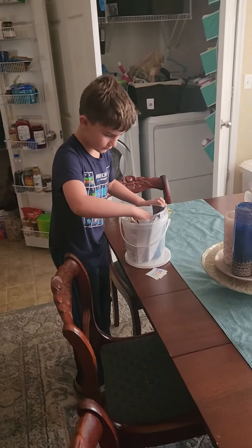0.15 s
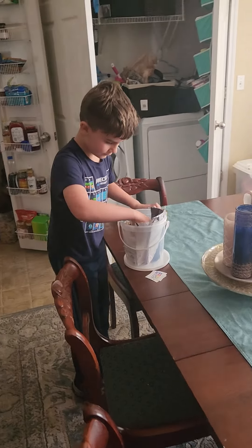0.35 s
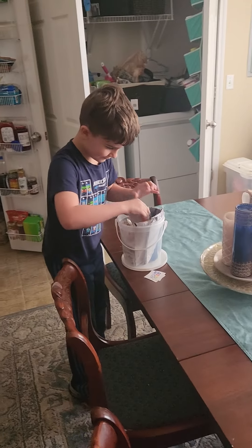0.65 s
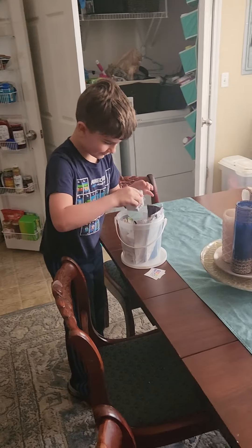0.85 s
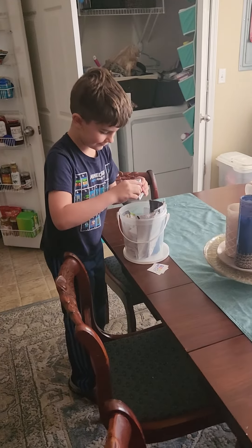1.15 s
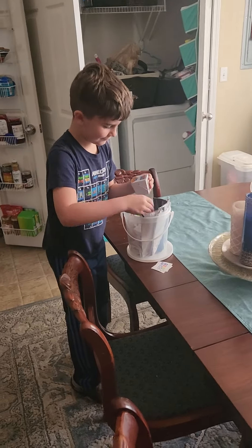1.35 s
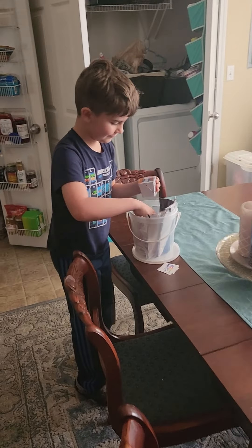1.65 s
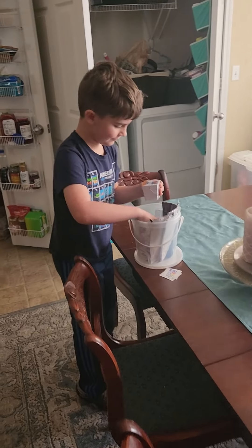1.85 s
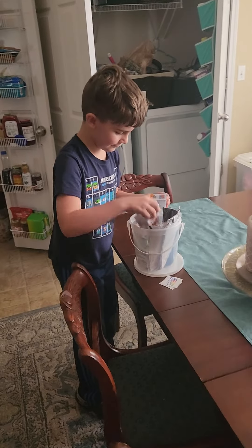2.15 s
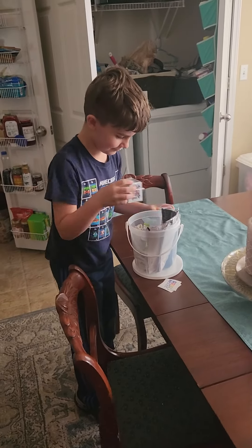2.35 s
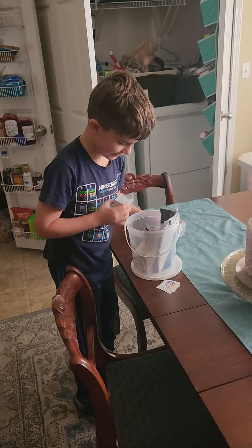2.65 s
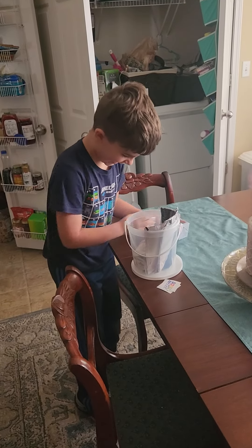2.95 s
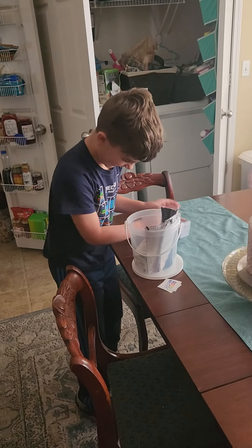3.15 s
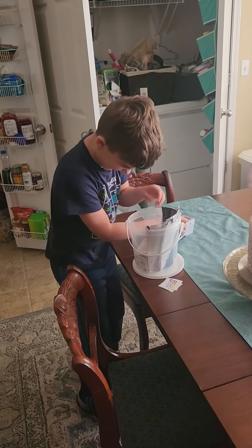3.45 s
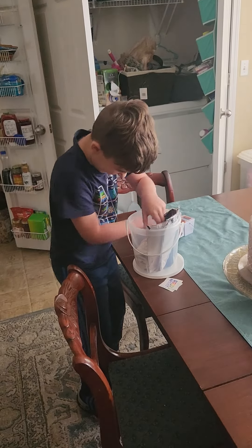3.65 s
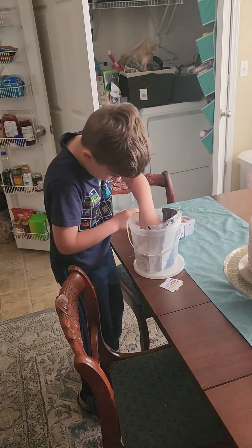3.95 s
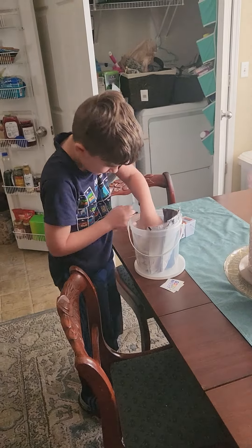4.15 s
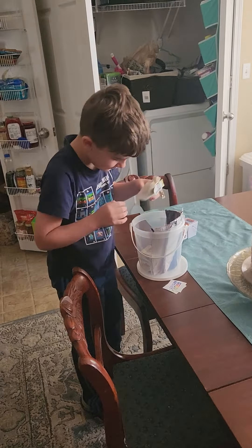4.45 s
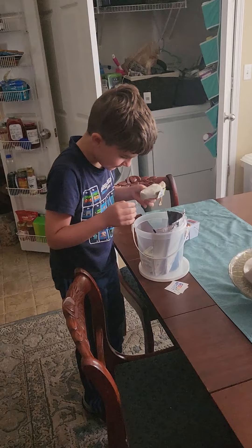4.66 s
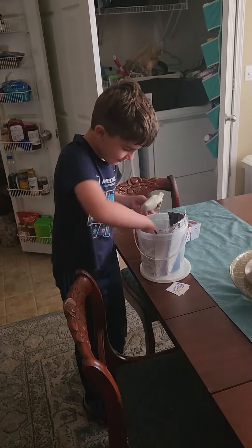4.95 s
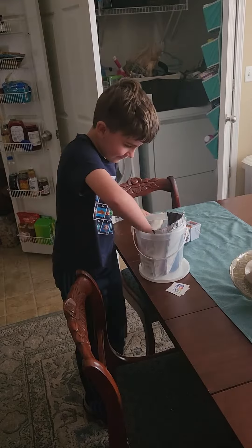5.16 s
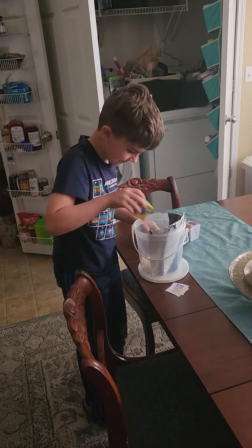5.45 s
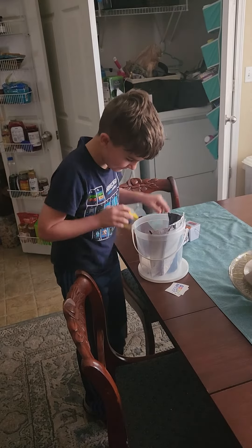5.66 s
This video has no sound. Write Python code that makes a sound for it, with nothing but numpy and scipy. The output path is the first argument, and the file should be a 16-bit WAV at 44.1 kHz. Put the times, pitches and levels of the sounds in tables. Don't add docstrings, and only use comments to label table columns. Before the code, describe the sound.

Small boxes bump the thin wall of a plastic pail while film, paper and card crackle and pop. Two busier bursts, at the start and just after three seconds, are separated by thin crisp wrapper snaps; a smaller burst comes after five seconds. Heard from a couple of metres off in a home room with a short natural echo, over very quiet household hum.

```python
import sys
import numpy as np
from scipy import signal
from scipy.io import wavfile
from scipy.ndimage import uniform_filter1d

SR = 44100
rng = np.random.default_rng(int(sys.argv[2]) if len(sys.argv) > 2 else 0)


def dump_mix(stems):
    frames = np.atleast_2d(stems).T
    limited = np.clip(frames, -1, 1)
    pcm = np.round(limited * 32767).astype(np.int16)
    wavfile.write(sys.argv[1], SR, pcm)


def magnitude_from_level(level_db):
    exponent = np.asarray(level_db, float) / 20
    return 10 ** exponent


N = 255331

# [share of its pitch, level/dB, t60/s]
BUCKET_AIR = [(0.998, -6, 0.092), (0.797, -8.5, 0.038), (1.5, -9.5, 0.048)]


def evened(x):
    return x / np.sqrt(np.mean(x ** 2) + 1e-20)


def peaked(x):
    return x / abs(x).max()


def read(points, hz):
    f, value = np.transpose(points)
    return np.interp(np.log(hz + 1), np.log(f + 1), value)


def add(mix, s, sound):
    part = mix[..., round(s * SR):][..., :sound.shape[-1]]
    part += sound[..., :part.shape[-1]]


def coloured(x, points):
    hz = abs(np.fft.fftfreq(4096, 1 / SR))
    log_gain = np.log(magnitude_from_level(np.maximum(read(points, hz), -100)))
    taps = np.fft.ifft(np.exp(np.conj(signal.hilbert(log_gain)))).real[:2048]
    taps = taps.reshape((1,) * (x.ndim - 1) + (-1,))
    return signal.oaconvolve(x, taps, axes=-1)[..., :x.shape[-1]]


def band(x, lo_hz, hi_hz):
    return signal.sosfilt(signal.butter(2, [lo_hz, hi_hz], "bandpass", fs=SR, output="sos"), x)


def resonate(x, hz, width_hz):
    turn = np.exp(2j * np.pi * np.cumsum(hz) / SR)
    pole = np.exp(-np.pi * width_hz / SR)
    return 2 * (turn * signal.lfilter([1 - pole], [1, -pole], x / turn)).real


def ring(modes, t, detune=1, rise_s=.002):
    x = 0
    for (hz, db, t60_s), d in zip(modes, detune * np.ones(len(modes))):
        x = x + magnitude_from_level(db - 60 * t / t60_s) * np.sin(2 * np.pi * hz * d * t)
    return peaked(x * (1 - np.exp(-t / rise_s)))


def pair(shape, same):
    a, b, c, d = rng.standard_normal(shape + (4,)).T
    same = np.clip(same, -1, 1)[:, None]
    left, other = a + 1j * b, c + 1j * d
    return np.array([left, same * left + np.sqrt(1 - same ** 2) * other])


def household():
    # [f/Hz, level/dB per Hz]
    hum_colour = [(12, -38), (20, 6.5), (117, 0.5), (297, -14.5), (913, -18), (1180, -17.5), (2010, -20.5),
                  (2730, -24), (5830, -28.5), (7730, -18), (8410, -33), (9670, -58), (12500, -104),
                  (15200, -77), (16500, -74)]
    # [f/Hz, likeness]
    hum_same = [(30, 0.92), (200, 0.78), (600, 0.24), (3000, 0.067), (16000, 0.034)]
    # [t/s, level/dB]
    rumble_level = [(0.0, -54.5), (1.4, -83), (1.92, -59.5), (2.32, -82), (4.55, -58.5), (5.79, -60)]
    frames, hz = N // 512 + 5, np.fft.rfftfreq(2048, 1 / SR)
    patches = uniform_filter1d(rng.standard_normal((frames, 1025)), 5, 0)
    patches = evened(uniform_filter1d(patches, 20, 1)).T
    z = pair((frames, 1025), read(hum_same, hz)) * magnitude_from_level(read(hum_colour, hz)[:, None] + 0.89 * patches)
    hum = magnitude_from_level(-68) * evened(signal.istft(z, nperseg=2048, noverlap=1536)[1][:, :N])
    rumble = evened(band(band(rng.standard_normal(N), 23.2, 36.6), 23.2, 36.6))
    return hum + rumble * magnitude_from_level(np.interp(np.arange(N) / SR, *np.transpose(rumble_level)) - 9.5)


def room(x):
    # [f/Hz, t60/s]
    room_t60 = [(100, 0.21), (400, 0.3), (1000, 0.3), (2500, 0.23), (6000, 0.22), (12000, 0.11)]
    # [f/Hz, likeness]
    room_same = [(200, 0.93), (400, 0.91), (1000, 0), (4000, 0.1)]
    # [f/Hz, level/dB]
    room_level = [(150, -4), (1000, -4.5), (5000, -5.5), (14000, -8.5)]
    hz, t = np.fft.rfftfreq(256, 1 / SR), np.arange(340) * 64 / SR
    decay = magnitude_from_level(-60 * t / read(room_t60, hz)[:, None])
    decay = decay / np.linalg.norm(decay, axis=1, keepdims=True) * magnitude_from_level(read(room_level, hz))[:, None]
    out, turn = np.zeros((2, N)), 2 * np.pi * 2.3 * np.arange(N) / SR
    for k in range(3):
        z = pair((len(t), len(hz)), read(room_same, hz)) * decay
        tail = signal.istft(z, nperseg=256, noverlap=192)[1]
        tail = np.pad(tail / np.linalg.norm(tail[0]), ((0, 0), (round(.005 * SR), 0)))
        share = np.sqrt(2 / 3) * np.cos(turn + 2 * np.pi * k / 3)
        out += signal.fftconvolve(x[None] * share, tail, axes=1)[:, :N]
    return out


def early(x):
    level_db, t60_s = -3, 0.017
    t, turn, out = np.arange(900) / SR, 2 * np.pi * 1.7 * np.arange(N) / SR, 0
    for share in (np.cos(turn), np.sin(turn)):
        taps = rng.standard_normal((2, len(t))) * (rng.random((2, len(t))) < .1) * magnitude_from_level(-60 * t / t60_s)
        taps = band(taps, 500, .49 * SR)
        taps = taps / np.linalg.norm(taps, axis=1, keepdims=True)
        out = out + signal.oaconvolve(x[None] * share, taps, axes=1)[:, :N]
    return magnitude_from_level(level_db) * out


def floor_thumps():
    # [t/s, peak level/dB]
    shifts = [
        (.775, -57),
        (3.22, -60),
        (3.3, -64),
        (3.47, -58),
        (3.53, -63),
    ]
    out, t = np.zeros(N), np.arange(9000) / SR
    for s, db in shifts:
        add(out, s, magnitude_from_level(db) * ring([(80.5, 0, .25)], t, rise_s=0.03))
    return out


def table_thuds():
    # [t/s, peak level/dB]
    blows = [(0.047, -68), (0.153, -48), (0.18, -44), (0.213, -42), (.398, -28.5), (.414, -54),
             (0.471, -42), (0.549, -53), (0.72, -41), (0.771, -32.5), (2.86, -51.5), (3.047, -47),
             (3.17, -46), (3.218, -47), (3.428, -34.5), (3.464, -33), (3.535, -44), (3.651, -39.5),
             (5.031, -71), (5.073, -67), (5.306, -60.5)]
    # [f/Hz, level/dB, t60/s]
    table_modes = [(152.3, -1.5, 0.17), (169.6, -6, 0.067), (134, -17, 0.24)]
    out, t = np.zeros(N), np.arange(9000) / SR
    for s, db in blows:
        add(out, s, magnitude_from_level(db - 8.0) * ring(table_modes, t, rise_s=0.0035))
    return out


def bucket_booms():
    # [t/s, peak level/dB, f/Hz]
    jolts = [(.152, -42.5, 382), (.179, -41.5, 377), (.399, -31.5, 343), (.414, -37.5, 312),
             (0.286, -57, 358), (.397, -38, 194), (5.3, -56, 231), (.47, -46.5, 312), (.605, -48, 380),
             (.645, -53, 387), (.685, -56, 385), (.53, -48, 403), (.571, -47, 389), (.717, -26.5, 366.6),
             (0.745, -35, 391), (0.769, -36, 344), (.789, -36.5, 363.4), (1.418, -64, 386),
             (1.577, -59, 382), (1.88, -63, 383), (1.95, -63.5, 376), (2.0, -63.5, 332), (2.074, -58, 395),
             (4.43, -62.5, 366), (5.25, -62.5, 384), (2.635, -51, 377), (2.857, -52, 332),
             (3.429, -59, 226), (3.464, -42.5, 372), (3.489, -65, 395), (3.578, -45.5, 377),
             (3.772, -53.5, 388), (3.923, -48, 377), (5.005, -54, 348), (5.03, -45.5, 448),
             (5.034, -43, 254.5), (5.068, -48.5, 343), (5.306, -49, 417)]
    out, t = np.zeros(N), np.arange(9000) / SR
    for s, db, hz in jolts:
        add(out, s, magnitude_from_level(db - 0.5) * ring(BUCKET_AIR, t, hz, rise_s=0.0018))
    return out


def tink():
    # t/s, peak level/dB, f/Hz, t60/s
    touch = (2.401, -61, 2240, .05)
    s, db, hz, t60_s = touch
    out, t = np.zeros(N), np.arange(9000) / SR
    add(out, s, magnitude_from_level(db) * ring([(hz, 0, t60_s)], t, rise_s=0.00032))
    return out


def knocks():
    # [t/s, peak level/dB, box tone f/Hz, wall against box level/dB]
    blows = [(.001, -59, 1270, -9), (.152, -41, 962, -1), (.154, -41.5, 615, -20), (.179, -42, 1183, -1.5),
             (.393, -40, 1713, -2), (.399, -32, 597, -1), (.408, -30, 1229, -5.5), (.42, -41, 2285, -13),
             (.453, -42, 1230, -3), (.53, -44, 1120, -1), (.571, -35, 1135, 3), (.718, -30.5, 899, -2),
             (.745, -36, 1090, -15), (.771, -27.5, 1580, -5), (1.418, -52, 1610, 5.5),
             (2.872, -48, 603, -1.5), (2.895, -47.5, 560, -3), (3.044, -50, 630, -18), (3.174, -36, 900, 2),
             (3.216, -26, 738, -4), (3.218, -38, 2250, -10), (3.492, -39, 2340, -5),
             (3.249, -41.5, 674, 1.5), (3.309, -37, 724, -2), (3.345, -49, 723, -14),
             (3.463, -42.5, 730, -8), (3.477, -29.5, 640, -18), (3.491, -30, 813, -6),
             (3.535, -37, 652, -2), (3.773, -44, 635, -4.5), (4.135, -52, 1500, 1), (4.16, -55, 800, 0),
             (4.424, -44, 1580, -14), (4.691, -56, 1584, 5), (4.915, -48, 1446, -14),
             (5.031, -41, 1453, -0.5), (5.033, -46, 933, -8), (5.049, -40.5, 485, -6),
             (5.279, -39, 1203, -8), (5.305, -31, 1154, -7.5), (5.322, -49, 1215, 0), (5.345, -47, 1145, 0),
             (5.596, -46, 656, -4.5), (5.678, -61, 735, -4)]
    # [share of its tone, level/dB, t60/s]
    box_modes = [(0.998, 5.5, 0.028), (0.974, -3.5, 0.039), (1.073, -1, 0.029), (0.873, -10.5, 0.067),
                 (1.3, -12, 0.032)]
    wall_top_hz, wall_t60_s = 3500, .085
    out, t = np.zeros(N), np.arange(9000) / SR
    for s, db, hz, wall_db in blows:
        grit = rng.standard_normal(900)
        rattle = grit * (abs(grit) > 2.3) * np.exp(-t[:900] / 0.0088) * 0.13
        rattle[0] = 1
        detune = hz * (1 + 0.018 * rng.standard_normal(len(box_modes)))
        box = signal.fftconvolve(ring(box_modes, t, detune), rattle)[:len(t)]
        wall = band(rng.standard_normal(len(t)), 0.53 * hz, wall_top_hz) * magnitude_from_level(-60 * t / wall_t60_s)
        add(out, s, magnitude_from_level(db - 2) * (peaked(box) + magnitude_from_level(wall_db) * peaked(wall)))
    return out


def strokes(rows):
    rise_db_per_s, fall_db_per_s = 402, 226
    rest_db = -91
    t = np.arange(0, N + 64, 64) / SR
    start, hold, db, colour = np.transpose(rows)[..., None]
    rise_db = rise_db_per_s * np.maximum(start - t, 0)
    fall_db = fall_db_per_s * np.maximum(t - start - hold, 0)
    power = magnitude_from_level(db - rise_db - fall_db) ** 2
    total = power.sum(0) + 1e-30
    level_db = 10 * np.log10(total + magnitude_from_level(rest_db) ** 2)
    colour = (power * colour).sum(0) / total
    return [np.interp(np.arange(N) / SR, t, curve) for curve in (level_db, colour)]


def grains(per_s, spread_db, clump_db):
    clumps = evened(uniform_filter1d(rng.standard_normal(N), 500))
    size = magnitude_from_level(spread_db * np.minimum(rng.exponential(1, N), 5) + clump_db * clumps)
    return size * (rng.random(N) < per_s / SR) * rng.choice([-1., 1.], N)


def hands():
    # [start t/s, hold/s, rustle level/dB, crisp top against rustle level/dB]
    rustles = [(.16, 0.059, -67, 3), (.3, 0.064, -63, 1.5), (.42, 0.1, -68.5, -3), (.57, 0.15, -66.5, 4),
               (1.44, 0.07, -67, -2), (1.57, 0.027, -62.5, 6), (1.67, 0.085, -71.5, -7.5),
               (1.86, 0.028, -65.5, 2.5), (2.05, 0.077, -69.5, 0), (2.2, 0.37, -86, 5.5),
               (2.84, 0.13, -58.5, -13), (3.02, 0.13, -56.5, -5), (3.2, 0.13, -55, -1.5),
               (3.35, 0.49, -59.5, 2), (3.58, 0.0082, -50, 3), (3.68, 0.075, -80, -14),
               (3.82, 0.11, -60.5, 1), (4.11, 0.13, -68.5, -9), (4.44, 0.23, -79.5, -8),
               (4.98, 0.075, -66, 2), (5.1, .1, -74, -1), (5.26, 0.086, -65, -0.5), (5.42, 0.14, -78, -15),
               (5.57, 0.0091, -64, -25)]
    # [start t/s, hold/s, scrape level/dB, tone f/Hz]
    drags = [(0., 0.013, -72.5, 1900), (.3, 0.23, -60.5, 1060), (.57, 0.088, -50.5, 1560),
             (.72, 0.1, -50.5, 680), (.79, 0.013, -49, 1190), (1.43, 0.16, -65, 1640),
             (1.66, 0.035, -56, 1910), (1.86, 0.067, -64.5, 1630), (2.05, 0.048, -66.5, 1160),
             (2.84, 0.4, -63.5, 720), (3.2, 0.086, -47, 735), (3.32, 0.26, -55.5, 730),
             (3.5, 0.19, -60.5, 686), (3.76, 0.02, -60, 626), (3.87, 0.058, -53, 1850),
             (4.12, 0.12, -61, 1320), (4.44, 0.15, -65.5, 1900), (4.93, 0.11, -65, 1600),
             (5.05, 0.053, -59.5, 703), (5.21, 0.034, -55.5, 2020), (5.27, 0.13, -63.5, 1240),
             (5.43, 0.27, -64.5, 1403), (5.58, 0.072, -77, 655)]
    # [f/Hz, level/dB per Hz]
    film_colour = [(1470, -26), (2500, -34), (2970, -14.5), (4200, 1.5), (4830, -3.5), (7540, 1.5),
                   (8350, -11.5), (9000, -11.5), (11700, -17.5), (19800, -120)]
    rustle_db, crisp_db = strokes(rustles)
    scrape_db, scrape_hz = strokes(drags)
    creases = grains(per_s=4400, spread_db=2.5, clump_db=1.0)
    film = magnitude_from_level(rustle_db - 1.0) * evened(coloured(creases, film_colour))
    sharp = creases + grains(per_s=250, spread_db=4, clump_db=3) * 1.5
    crisp = magnitude_from_level(rustle_db + crisp_db - 4) * evened(band(sharp, 10000, 20000))
    drag = grains(per_s=4000, spread_db=2, clump_db=1.5)
    scrape = evened(resonate(drag, scrape_hz, width_hz=870)) + magnitude_from_level(-9.0) * evened(band(drag, 420, 2000))
    open_air = ring(BUCKET_AIR[:1], np.arange(9000) / SR, 377)
    air = evened(signal.oaconvolve(drag, open_air)[:N])
    return film + crisp + magnitude_from_level(scrape_db - 8.0) * scrape + magnitude_from_level(.5 * rustle_db - 47.0) * air


def crease(ticks, db, crisp_db, hz):
    body = band(band(ticks, 0.38 * hz, 7700), 940, 9500)
    panel = band(ticks, hz * 0.92, hz * 1.04)
    top = band(ticks, 10000, 20000)
    return magnitude_from_level(db) * (peaked(body) + magnitude_from_level(-14) * peaked(panel) + magnitude_from_level(crisp_db + 8.0) * peaked(top))


def crumples():
    # [t/s, peak level/dB, crispness level/dB, panel tone f/Hz, swell/s]
    fists = [(1.4044, -41, 2.5, 4780, 0.017), (1.656, -39, -32, 1950, 0.028),
             (1.6902, -58, -28, 2220, 0.016), (2.0778, -37.5, -3.5, 4120, 0.0042),
             (2.634, -29.5, -16, 2570, 0.02), (2.67, -36.5, -24, 3950, 0.013),
             (2.843, -40, -27, 4130, 0.022), (2.875, -30.5, -19, 4200, 0.016),
             (2.8995, -33.5, -13, 4450, 0.01), (3.5714, -24, -4, 6160, 0.0083),
             (3.7755, -35.5, -2, 6000, 0.029), (3.927, -25.5, -9, 5600, 0.011),
             (4.136, -39.5, 4, 2180, 0.013), (4.4393, -33.5, -9, 3040, 0.01),
             (4.693, -37.5, -5.5, 3500, 0.021), (5.2772, -58, -17, 2100, 0.012)]
    out, t = np.zeros(N), np.arange(4000) / SR
    for s, db, crisp_db, hz, swell_s in fists:
        grit, pick = rng.standard_normal((2, len(t)))
        u = t / np.clip(swell_s, .003, .03)
        ticks = grit * magnitude_from_level(6 * pick) * u * np.exp(-u)
        add(out, s - .6 * swell_s, crease(ticks, db - 12.0, crisp_db, hz))
    return out


def snaps():
    # [t/s, peak level/dB, panel tone f/Hz]
    film_snaps = [(0.178, -38.5, 3760), (0.5293, -40, 2190), (.717, -32, 2120), (1.4062, -44, 4360),
                  (1.425, -30, 5850), (1.5136, -28.5, 7600), (1.514, -42, 1490), (1.572, -45, 4460),
                  (1.586, -57, 4430), (1.6228, -45, 5200), (1.787, -53.5, 5000), (1.8494, -42, 4440),
                  (1.967, -51, 6940), (2.058, -49, 3900), (2.073, -43.5, 3920), (2.1671, -35.5, 3300),
                  (2.636, -35.5, 3600), (2.657, -34.5, 3070), (2.664, -49, 4300), (2.695, -50, 3720),
                  (2.878, -48, 3960), (2.3999, -50.5, 2270), (2.6495, -36.5, 4600), (3.578, -30, 6700),
                  (3.699, -39.5, 4840), (3.729, -38, 5600), (3.8878, -37, 4250), (3.9231, -33, 3800),
                  (4.712, -39.5, 3000), (4.9644, -47, 2020), (5.004, -32.5, 4300), (5.204, -52, 3400),
                  (5.297, -41, 4000), (5.35, -45, 4400), (5.5493, -45.5, 3030)]
    # [t/s, peak level/dB, panel tone f/Hz]
    paper_snaps = [(0.283, -42.5, 5870), (0.315, -43.5, 4800), (0.354, -38, 2070), (0.7705, -25, 2340),
                   (1.435, -38.5, 6800), (1.6597, -47.5, 2070), (1.923, -52, 2870), (2.6354, -52, 1970),
                   (3.1752, -23.5, 2240), (3.2145, -41, 2130), (3.477, -37, 2570), (3.6425, -35, 4170),
                   (3.6763, -46, 3330), (3.9062, -37, 2640), (4.0547, -41.5, 6030), (4.136, -47, 3000),
                   (4.1624, -34.5, 5900), (4.324, -44.5, 3500), (4.342, -38, 6060), (4.3672, -37, 3500),
                   (5.2749, -39.5, 2060), (5.302, -37, 2100), (5.4802, -40.5, 4900), (5.564, -39, 4960)]
    # [t/s, peak level/dB, panel tone f/Hz]
    card_snaps = [(0.153, -47, 2150), (0.393, -33, 2100), (.5721, -25.5, 2070), (1.8625, -37, 4750),
                  (3.427, -42, 2770), (3.49, -30.5, 2010), (4.249, -49, 2080), (4.425, -25.5, 2620),
                  (4.59, -60, 2040), (4.692, -44, 2970), (4.9167, -40, 4500), (5.033, -35.5, 2140),
                  (5.217, -46, 1960), (5.6486, -42.5, 6040)]
    # [crispness level/dB, run of after-ticks/s]
    materials = [
        (-4, 0.00087),
        (-13, 0.002),
        (-20, 0.00053),
    ]
    out, t = np.zeros(N), np.arange(1500) / SR
    for events, (crisp_db, run_s) in zip((film_snaps, paper_snaps, card_snaps), materials):
        for s, db, hz in events:
            grit, pick = rng.standard_normal((2, len(t)))
            ticks = grit * (pick > 1.2) * np.exp(-t / np.clip(run_s, .001, .02)) * .5
            ticks[0] = 0.96
            add(out, s, crease(ticks, db + 0.5, crisp_db, hz))
    return out


def scene():
    bucket = floor_thumps() + table_thuds() + bucket_booms() + tink() + knocks()
    near = bucket + hands() + crumples() + snaps()
    direct = magnitude_from_level(-1.5) * np.array([np.roll(near, -2), near])
    return household() + magnitude_from_level(-1) * room(near) + early(near) + direct


def low_pass(x):
    return signal.sosfilt(signal.butter(12, 16990, fs=SR, output="sos"), x)


def record(dry):
    # [f/Hz, level/dB]
    port_colour = [(7500, 2), (8400, 8), (9200, -1.5), (10300, 0.5), (11500, 7), (15500, 4)]
    # [f/Hz, level/dB]
    lean = [(200, 0.5), (500, 3), (1500, 3), (5000, 2), (12000, -2.5)]
    heard = coloured(dry, port_colour)
    left = coloured(heard[0], [(hz, .5 * db) for hz, db in lean])
    right = coloured(heard[1], [(hz, -.5 * db) for hz, db in lean])
    edge = signal.firwin(401, 15950, window=("kaiser", 5), fs=SR)
    mix = signal.oaconvolve(np.array([left, right]), edge[None], "same", axes=1)
    return low_pass(mix)


dry = scene()
out = record(dry)
dump_mix(out)
```